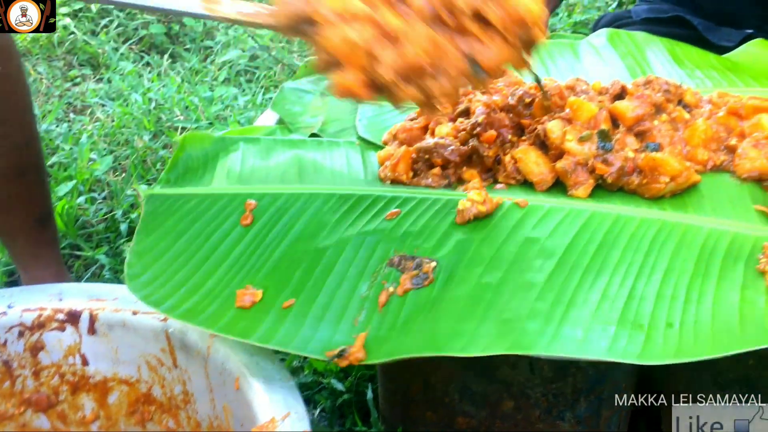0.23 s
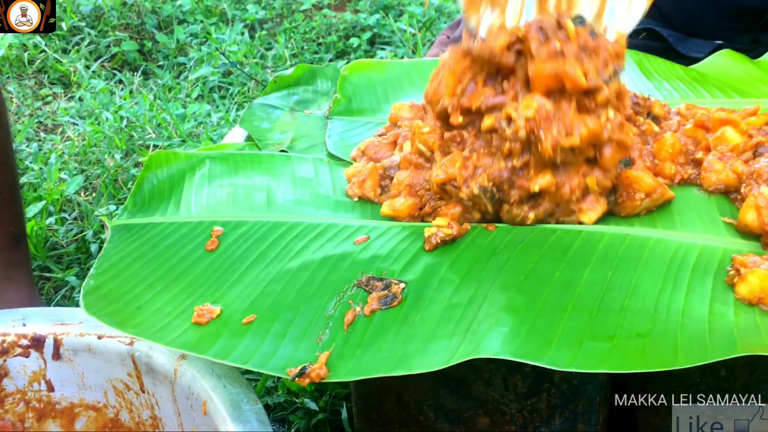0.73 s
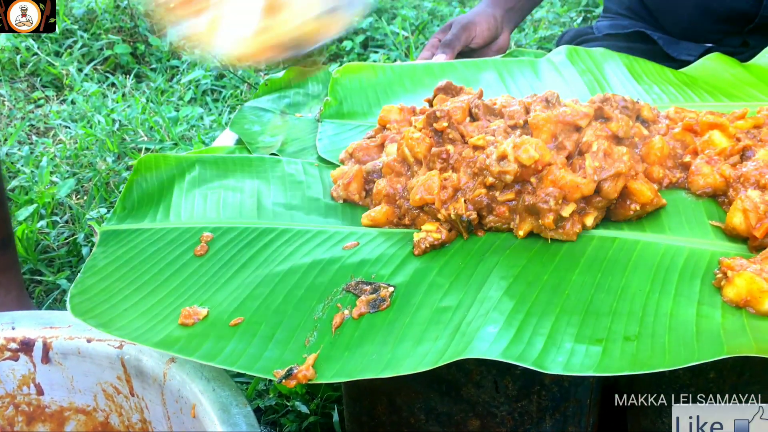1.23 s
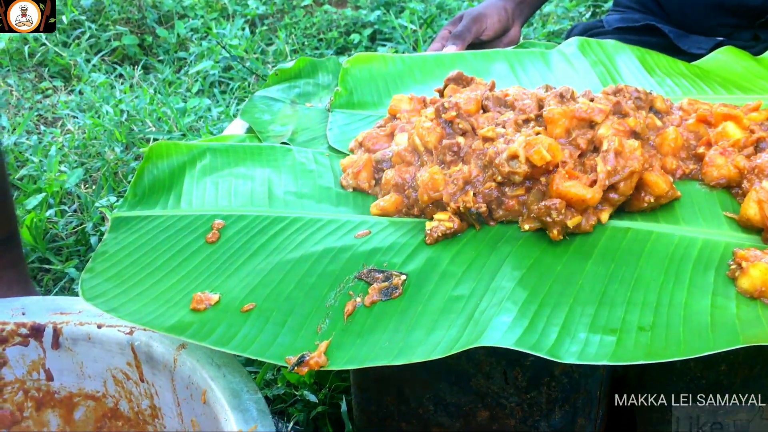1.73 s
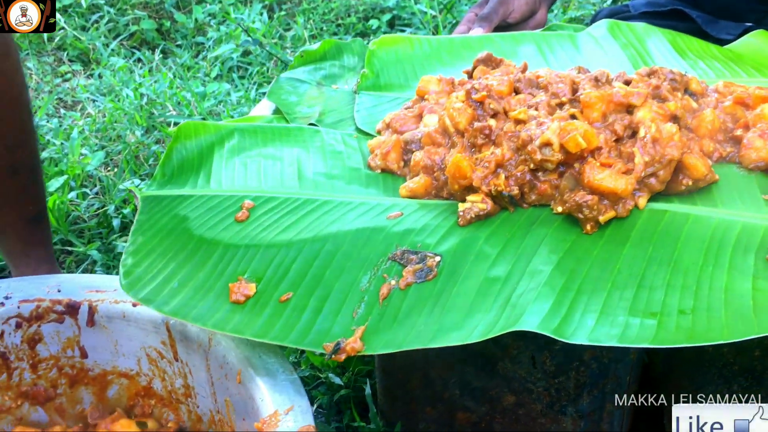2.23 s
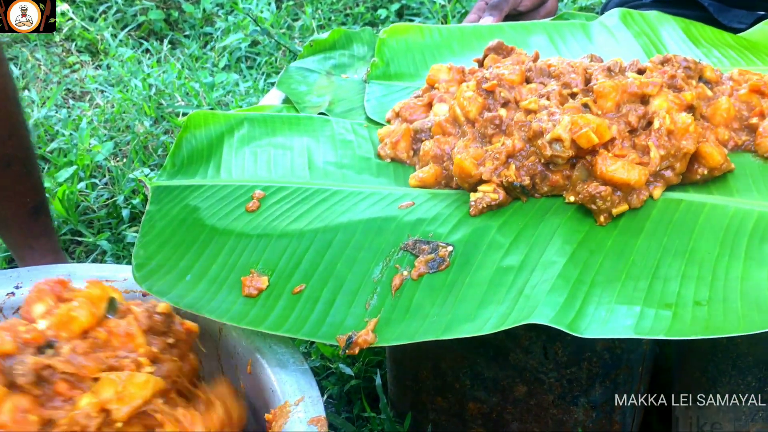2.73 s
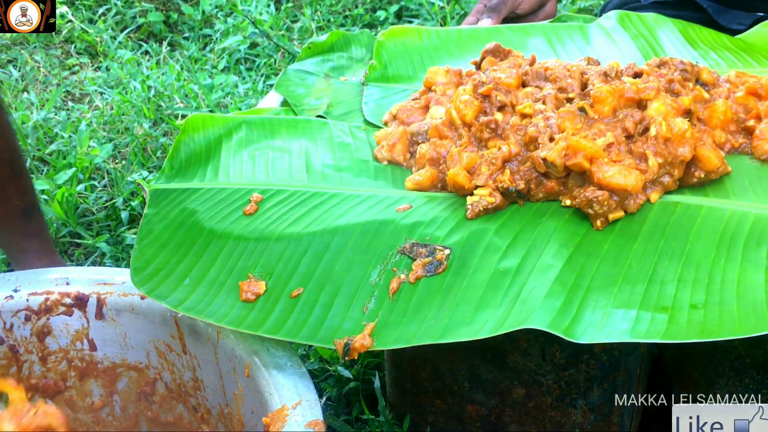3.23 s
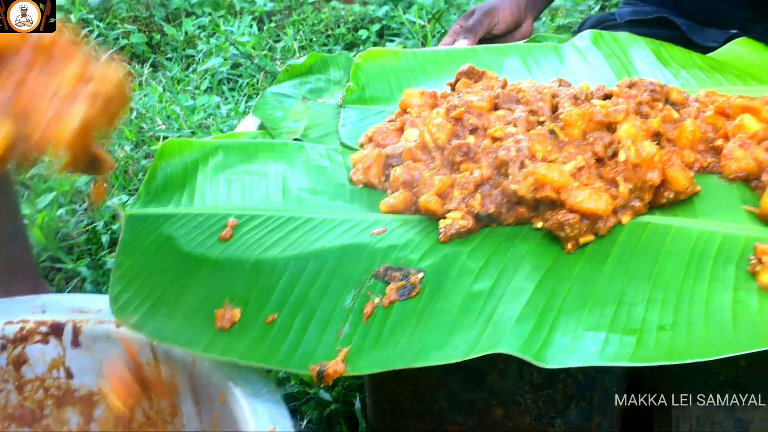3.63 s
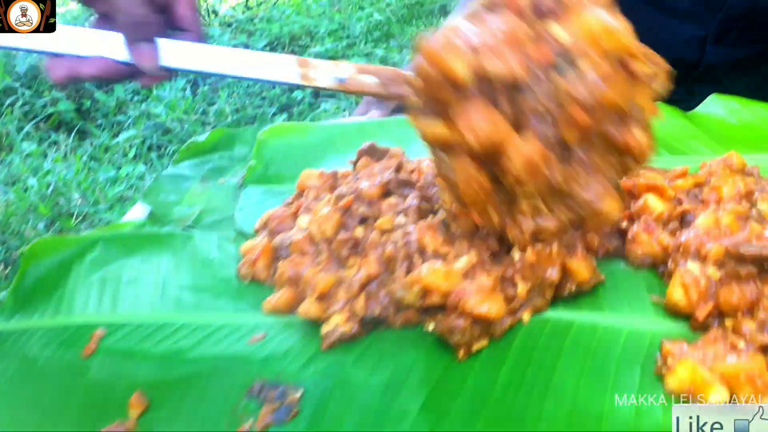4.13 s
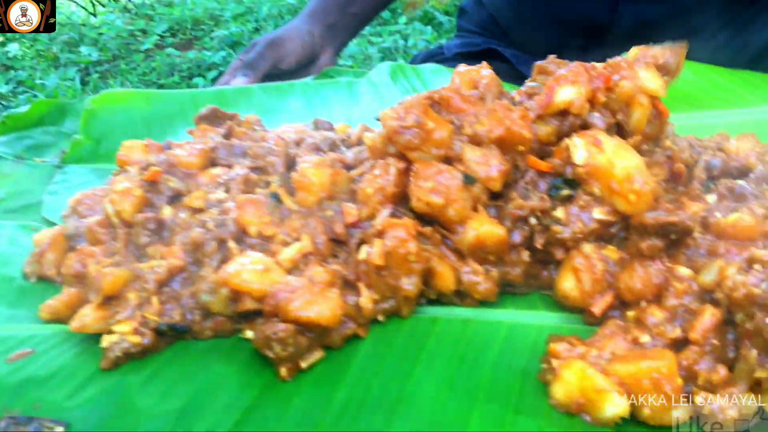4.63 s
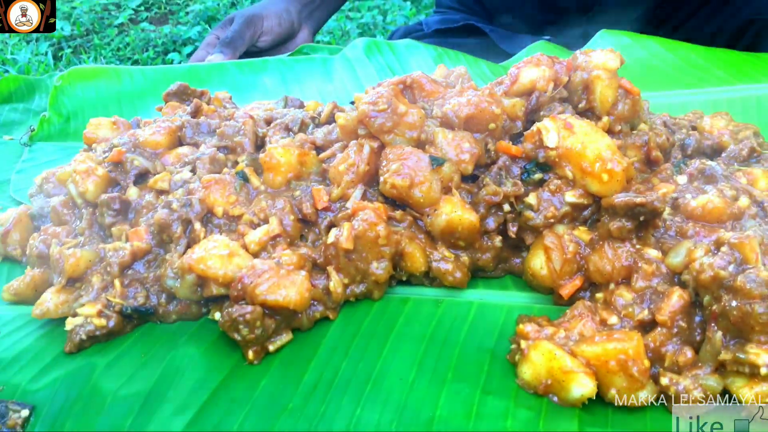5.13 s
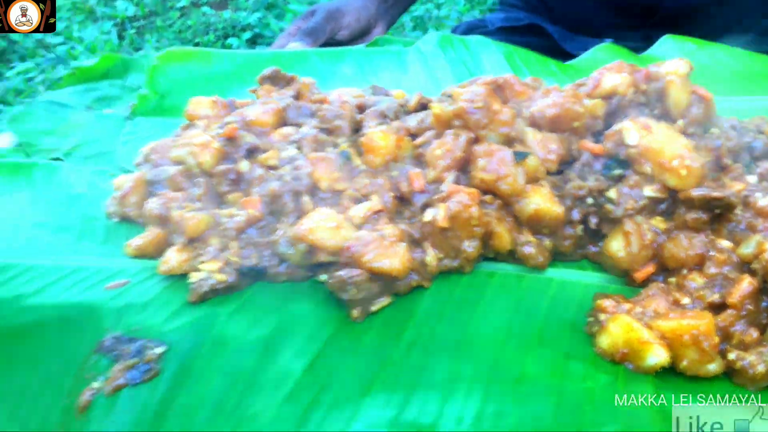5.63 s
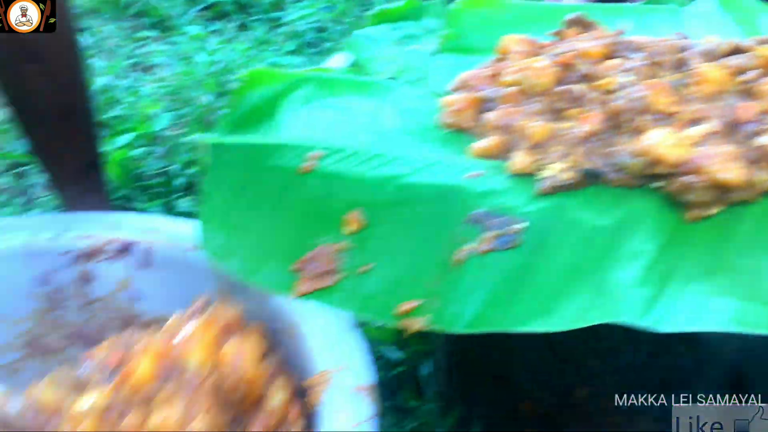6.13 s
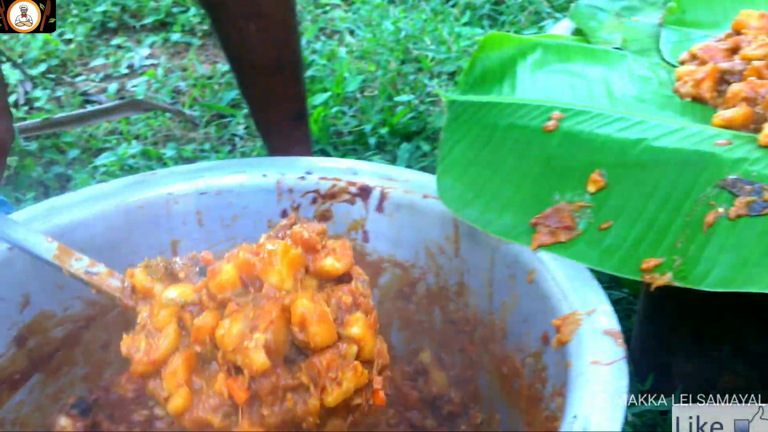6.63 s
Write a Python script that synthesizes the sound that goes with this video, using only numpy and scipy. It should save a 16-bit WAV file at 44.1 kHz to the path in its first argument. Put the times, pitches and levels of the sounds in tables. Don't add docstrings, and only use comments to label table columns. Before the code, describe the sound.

Outdoors, a metal ladle gives two short, rough scrapes through thick food in a metal pot, with knocks, wet plops and sticky crackles.

```python
import sys
import numpy as np
from scipy import signal
from scipy.io import wavfile
from scipy.ndimage import uniform_filter1d

SR = 44100
rng = np.random.default_rng(int(sys.argv[2]) if len(sys.argv) > 2 else 0)


def to_linear_factor(level_db):
    exponent = np.asarray(level_db, float) / 20
    return 10 ** exponent


def put_to_file(sound):
    columns = np.atleast_2d(sound).T
    safe = np.clip(columns, -1, 1)
    whole_steps = np.round(safe * 32767)
    wavfile.write(sys.argv[1], SR, whole_steps.astype(np.int16))


N = 303849

# (frequency [Hz], density [dB/Hz])
AIR_SPECTRUM = [(15, -36), (25, -2), (70, 2), (127, -1.5), (427, -34.5), (516, -17.5), (1480, -24.5),
                (2220, -24), (2760, -32), (3160, -23.5), (4870, -29.5), (9320, -38), (14800, -42.5),
                (16000, -51)]
# (time [s], cycle rate [Hz], level [dB])
ENGINE_CURVE = [(0.0, 28.12, -50.5), (1.92, 27.22, -51.5), (3.67, 24.25, -51.5), (4.05, 24.38, -57),
                (4.72, 23.67, -55), (6.62, 25.41, -55), (6.75, 24.6, -62), (6.89, 26.4, -60)]
# (multiple of cycle rate [-], level [dB])
ENGINE_ORDERS = [(2, -2.5), (3, -7), (4, -6), (5, -11.5), (6, -9), (7, -15)]
# (time [s], peak [dB])
CHIRPS = [(0.565, -59), (0.96, -62), (1.36, -61), (2.88, -61), (3.64, -63), (4.07, -59), (4.53, -60),
          (4.865, -50), (5.235, -57), (5.94, -55), (6.32, -60), (6.68, -61)]
# (start [s], end [s], fizz level [dB], top fizz level [dB])
RUSTLES = [(0, .05, -57, -68), (.17, 0.313, -63.5, -79), (.44, .52, -63, -70), (0.64, 0.765, -72, -68),
           (1.717, 1.82, -62.5, -67), (2.29, 2.483, -66, -61), (2.78, 2.96, -68, -62),
           (2.468, 2.561, -55.5, -58), (2.55, 2.642, -66, -69), (2.639, 2.795, -58.5, -54),
           (2.848, 2.902, -56.5, -65), (2.94, 3.078, -61.5, -64), (3.173, 3.265, -82, -71),
           (3.898, 4.102, -58.5, -62.5), (4.221, 4.412, -63.5, -62), (4.4, 4.51, -62, -55),
           (4.45, 4.59, -60.5, -55), (5.432, 5.552, -67, -80), (5.89, 6.003, -60, -72),
           (6.011, 6.228, -56, -59.5), (6.28, 6.448, -66, -73), (6.474, 6.587, -63, -64.5),
           (6.805, 6.89, -62.5, -65)]
# (middle [s], level [dB], length [s])
HEAVES = [
    (0.25, -62, 0.2),
    (2.1, -57, 0.3),
    (3.6, -60, 0.3),
    (3.92, -56, .07),
    (4.44, -56, 0.09),
    (4.62, -56, .08),
    (5.8, -56, 0.3),
]
# (time [s], peak [dB], pitch [Hz])
FILM_TICKS = [(2.3452, -35, 12600), (2.3891, -55, 12300), (2.4116, -67, 10500), (2.4116, -52, 14800),
              (2.4235, -50, 11200), (2.4405, -48, 11900), (2.4889, -44, 12400), (2.5118, -46, 11100),
              (2.5258, -61, 13400), (2.5258, -41, 12100), (2.5408, -36, 14100), (2.5617, -49, 11900),
              (2.648, -44, 12300), (2.7174, -36, 12300), (2.8157, -53, 13200), (2.8396, -50, 11900),
              (2.8581, -53, 11700), (2.8825, -49, 11700), (2.9109, -69, 12700), (2.9109, -46, 12300),
              (2.9404, -50, 12800), (2.9593, -49, 14400), (2.9748, -47, 13500), (3.0012, -43, 11400),
              (3.0097, -45, 14800), (3.0357, -50, 15200), (3.1684, -47, 12600), (3.2003, -44, 15000),
              (2.3453, -42, 8560), (2.3967, -53, 6720), (2.3967, -44, 5680), (2.4237, -46, 9810),
             (2.4306, -44, 5030), (2.4441, -39, 6910), (2.4945, -53, 9630), (2.4945, -39, 6330),
             (2.512, -35, 7200), (2.5184, -36, 6980), (2.5454, -35, 5880), (2.5858, -52, 9110),
             (2.5858, -44, 8650), (2.5933, -40, 5280), (2.6322, -41, 5100), (2.7005, -42, 5570),
             (2.8672, -46, 5710), (2.8826, -37, 7390), (2.9415, -52, 9760), (2.955, -39, 8750),
             (2.9749, -46, 5220), (3.0093, -56, 6870), (3.0093, -41, 5630), (3.0462, -46, 5820),
             (3.0647, -42, 8040), (3.1974, -44, 7880),
              (5.9123, -52, 6230), (5.9302, -46, 6160), (5.9756, -48, 6610), (6.0205, -43, 14300),
              (6.0395, -43, 6440), (6.0719, -40, 9400), (6.0983, -40, 8520), (6.1597, -37, 7050),
              (6.1876, -41, 8540), (6.238, -35, 6050), (6.264, -45, 6300), (6.2884, -42, 6350),
              (6.3697, -49, 9420), (6.4211, -47, 6000), (6.4211, -45, 6450), (6.479, -40, 6380),
              (6.4999, -44, 9700), (6.5438, -35, 6790), (6.5683, -42, 13600), (6.5962, -47, 12300),
              (6.6117, -41, 6260), (6.6371, -49, 8200), (6.7289, -45, 6530), (6.7489, -46, 7220),
              (6.7768, -48, 6290), (6.8117, -49, 13000), (6.8202, -48, 8660), (6.8401, -50, 6060),
              (6.8596, -51, 12700), (6.8651, -48, 11500),
              (0.0323, -45, 8290), (0.2404, -49, 6050), (0.2688, -44, 6020), (0.4494, -40, 13400),
               (0.4793, -37, 6160), (0.5137, -34, 7710), (0.6679, -38, 7290), (0.7003, -43, 6160),
               (0.7332, -36, 8430), (0.7532, -31, 8570), (0.856, -50, 6470), (1.7559, -41, 8170),
               (1.8118, -48, 7190), (1.8492, -41, 6170),
              (3.9228, -41, 7810), (3.9238, -39, 6780), (4.1508, -43, 6480), (4.2282, -42, 6210),
              (4.2661, -42, 6940), (4.2995, -39, 6090), (4.3643, -45, 6660), (4.3813, -43, 8300),
              (4.4097, -36, 11800), (4.5923, -45, 9100), (4.7101, -53, 6770), (4.7699, -40, 8250),
              (5.192, -48, 7010), (5.2713, -51, 6690), (5.4434, -49, 6140), (5.4963, -51, 6150)]
# (time [s], peak [dB], pitch [Hz], spray re peak [dB])
TIPPED_LUMPS = [(0.023, -39, 1950, -4), (0.219, -35, 815, -25), (0.27, -20.5, 950, -27),
                (0.336, -38, 2970, -28), (0.454, -39.5, 1200, -6), (0.477, -39, 3290, -2),
                (0.491, -34, 1270, -13), (0.514, -33.5, 7140, -22), (0.733, -36.5, 8430, -9),
                (0.753, -35, 4600, -1), (1.382, -38.5, 3240, -24)]
# (time [s], peak [dB], pitch [Hz], spray re peak [dB])
SNAGGED_LUMPS = [
    (1.74, -37.5, 3670, -19),
    (1.813, -36.5, 2280, -18),
    (1.8487, -23, 2100, -37),
    (1.9006, -36, 2020, -17),
    (2.163, -9, 2980, -35),
    (2.2827, -20.5, 2440, -23),
    (2.3451, -34.5, 12650, 0),
    (5.5588, -31, 3550, -28),
    (5.5847, -21, 3500, -5),
    (5.6725, -10, 3220, -24),
]
# (time [s], peak [dB], pitch [Hz], spray re peak [dB], T60 [s])
DROPPED_LUMPS = [(3.4441, -25.5, 2200, -22, 0.034), (3.4655, -23, 6140, -12, 0.032),
                 (3.4704, -36, 1430, -16.5, 0.016), (3.5079, -36, 3950, -22, 0.021),
                 (3.5433, -37, 2480, -3, 0.023), (3.5474, -30, 12100, -26, 0.025),
                 (3.5668, -17.5, 3940, -19, 0.012), (3.5704, -17.5, 3920, -19.5, 0.014),
                 (3.6184, -23, 5860, -16.5, 0.026), (3.6237, -19.5, 2500, -6.5, 0.019),
                 (3.6616, -38, 3080, -1, 0.02), (3.7125, -23.5, 3500, -11, 0.025),
                 (3.7174, -25, 4150, -18, 0.028), (3.7239, -17, 7200, -26, 0.014),
                 (3.7304, -21.5, 3500, -27, 0.021), (3.7404, -33, 1780, -21.5, 0.019),
                 (3.7738, -40, 8000, -6, 0.03), (3.8067, -21, 2100, -15, 0.035),
                 (3.8144, -34, 5500, -22, 0.03), (3.8796, -40, 1380, -25.5, 0.025),
                 (3.9144, -34, 1100, -24, 0.025), (3.9235, -27, 3320, -14, 0.03)]
# (time [s], peak [dB], pitch [Hz])
SAUCE_SNAPS = [(2.4443, -38.5, 2020), (2.4947, -36, 6330), (2.5114, -33.5, 9440), (2.5187, -31, 4160),
               (2.5456, -36, 5870), (2.586, -35.5, 1840), (2.6045, -35, 4570), (2.6214, -31, 3410),
               (2.6319, -30, 3280), (2.6983, -37.5, 2200), (2.7414, -39, 3310), (2.8823, -36, 9000),
               (2.9557, -29.5, 3380), (3.244, -34, 9000), (3.3238, -33, 5500), (3.3917, -34, 4000),
               (4.2782, -37.5, 3640), (4.3331, -37, 4300), (4.7701, -54, 10000), (5.9303, -35.5, 4250),
               (6.049, -36, 2110), (6.1303, -34, 3730), (6.1567, -33, 2340), (6.1832, -32.5, 2610),
               (6.2381, -35, 6100), (6.2889, -33.5, 4300), (6.479, -27, 4300), (6.5, -33.5, 2660),
               (6.5484, -33.5, 1817), (6.5693, -32.5, 2400),
               (0.45, -42.5, 8800), (0.667, -45, 4040), (0.856, -38, 3800), (1.77, -42, 13000),
           (2.39, -41, 2520), (2.4239, -38.5, 4570), (2.4854, -38, 3490), (2.5404, -39.5, 12500),
           (2.5934, -35, 6200), (2.7174, -39, 12300), (2.8709, -41, 2505), (3.0096, -36, 11000),
           (3.0579, -39, 3330), (3.1976, -39, 7880), (3.2625, -35.5, 5670), (4.1759, -42.5, 3910),
           (4.2283, -40, 5550), (4.2992, -40, 10000), (4.4099, -37.5, 3130), (5.4964, -38, 3780),
           (5.5674, -40, 5130), (6.0216, -41, 12000), (6.074, -40, 12000), (6.099, -39, 12500),
           (6.127, -40, 12500), (6.55, -31, 11000), (6.6117, -38, 6260), (6.7294, -35.5, 3530),
           (6.8402, -39.5, 1780)]
# (time [s], peak [dB], pitch [Hz])
PLOPS = [(3.247, -44, 1750), (3.324, -46, 2050), (3.324, -44, 650), (3.391, -44, 1750), (3.466, -37, 2050),
         (4.032, -48, 1350), (4.043, -45, 2200), (4.183, -49, 1500), (4.265, -48, 2400), (4.278, -46, 900),
         (4.358, -45, 1300), (4.41, -47, 750), (4.592, -47, 650), (5.271, -45, 6000), (5.487, -46, 1600),
         (3.729, -30, 1350), (3.625, -33, 1500), (5.559, -42, 570), (6.265, -43, 6000)]
# (time [s], low mode peak [dB], low mode [Hz], second mode [dB], upper modes [dB])
BLOWS = [(0.196, -40, 371, -54.5, -54), (1.849, -21, 307, -30, -21), (2.282, -13, 259, -3.5, -19),
         (2.331, -37, 180, -39.5, -48), (3.47, -45, 270, -58, -65), (3.568, -48, 300, -46, -48),
         (3.807, -52, 300, -50, -42), (6.23, -49, 275, -60, -75), (3.247, -24.5, 274, -34.5, -60),
         (3.33, -40.5, 263, -60.5, -74), (3.624, -40.5, 253, -44.5, -54), (3.712, -49.5, 360, -41.5, -40),
         (3.883, -36, 238, -50, -42), (3.893, -39.5, 170, -42, -41), (3.924, -42, 397, -38, -37),
         (4.402, -41, 224, -71, -54), (4.433, -42.5, 205, -75, -56), (4.492, -41, 183, -72, -57),
         (4.599, -41, 190, -60, -52), (5.581, -28, 283, -37.5, -28), (5.86, -13.5, 251, -26.5, -25),
         (6.517, -34.5, 284.9, -49.5, -61)]
# (frequency [Hz], level [dB], T60 [s])
UPPER_MODES = [(910, -1, 0.029), (1216, -5, 0.052), (1500, 0.5, 0.01), (1860, 1, .04), (2235, -2, 0.015),
               (3220, -6.5, 0.018)]
# (time [s], rasp level [dB])
STROKES = [
    [(1.9, -71), (1.955, -34), (1.985, -31.5), (2.03, -37), (2.062, -29.5), (2.15, -30), (2.17, -26.5),
     (2.256, -32), (2.28, -52)],
    [(5.572, -58), (5.581, -33.5), (5.679, -25), (5.71, -22.5), (5.808, -23.5), (5.826, -56)],
    [(5.834, -40), (5.838, -24.5), (5.857, -26.5), (5.875, -46.5)],
]
# (frequency [Hz], density [dB/Hz])
WALL_RESPONSE = [(110, -44), (180, -14), (202, -19), (275, -7), (364, -14), (656, -1.5), (860, -5),
                 (1160, -3), (1840, -1.5), (2000, 0.5), (2240, -5.5), (3210, -1.5), (9000, -23),
                 (11700, -46.5), (19800, -120)]
LOW_WALL_HZ = [215, 283, 400, 490, 571, 668, 800, 926, 1050, 1170, 1240]
# (middle [s], frequency [Hz], level re rasp [dB])
STREAKS = [(2.004, 1250, -5), (2.054, 2360, -7), (2.093, 3700, -2), (2.129, 4550, -4), (2.195, 4330, 0.5),
           (2.235, 4110, 2.5), (2.229, 2510, -5), (5.629, 1240, -12), (5.672, 4175, -2.5),
           (5.719, 3320, -3), (5.74, 4700, -5), (5.77, 5600, -7), (5.79, 4340, -4.5), (5.801, 6130, -8),
           (1.96, 290, -9), (2.0, 290, -10), (2.055, 290, -17), (2.09, 670, -10), (2.22, 660, -13),
           (2.255, 225, -11), (1.975, 1170, -6), (5.64, 280, -15), (5.645, 570, -10), (5.71, 920, -12),
           (5.76, 290, -21), (5.79, 310, -18), (5.8, 600, -17), (5.65, 9000, -18), (5.68, 10000, -15),
           (5.74, 11700, -18), (5.857, 2285, -1.5), (5.855, 3100, -4)]
# (time [s], peak [dB])
GRABS = [(1.952, -27), (1.984, -23), (2.054, -21), (2.088, -20), (2.119, -22), (2.218, -19), (5.605, -24),
         (5.688, -16), (5.702, -18), (5.717, -15), (5.728, -15), (5.738, -14), (5.763, -18), (5.778, -15),
         (5.796, -16), (5.852, -17)]

FIRM_STROKE_DB = -28


def set_rms_db(x, db):
    return x * to_linear_factor(db) / np.sqrt(np.mean(x ** 2))


def band(x, lo_hz, hi_hz, order=2):
    return signal.sosfilt(signal.butter(order, [lo_hz, min(hi_hz, .45 * SR)], "bandpass", fs=SR, output="sos"), x)


def read(table):
    s, *columns = np.transpose(table)
    return [np.interp(np.arange(N) / SR, s, c) for c in columns]


def walk(rate_hz, size=N):
    k = int(SR / rate_hz)
    held = np.repeat(rng.standard_normal(size // k + 1), k)
    return 1.3 * uniform_filter1d(uniform_filter1d(held, k), k)[:size]


def clicks(rate_hz, spread_db):
    hit = rng.random(N) < rate_hz / SR
    return set_rms_db(hit * rng.standard_normal(N) * to_linear_factor(spread_db * rng.exponential(size=N)), 0)


def add(out, s, sound):
    i = int(s * SR)
    out[i:i + len(sound)] += sound[:N - i]


def ring(hz, t60_s, rise_s):
    t = np.arange(SR // 8) / SR
    shape = (1 - np.exp(-(t / rise_s) ** 2)) * to_linear_factor(-60 * t / t60_s)
    return shape / shape.max() * np.sin(2 * np.pi * hz * t)


def air():
    out = 0
    f_hz, density_db = np.transpose(AIR_SPECTRUM)
    for hz in 32 * 2 ** np.arange(0, 9, .5):
        flicker_db = 2.5 * walk(4) * min(200 / hz, 1)
        db = np.interp(np.log(hz), np.log(f_hz), density_db) + flicker_db
        out = out + to_linear_factor(db) * band(rng.standard_normal(N), hz / 2 ** .25, hz * 2 ** .25)
    return set_rms_db(out, -52)


def engine():
    cycle_hz, db = read(ENGINE_CURVE)
    phase = 2 * np.pi * np.cumsum(cycle_hz * (1 + 0.0057 * walk(13))) / SR
    out = 0
    for k, order_db in ENGINE_ORDERS:
        fade_db = 2.5 * walk(1.5) + 3.0 * walk(8)
        out = out + to_linear_factor(order_db + fade_db) * np.sin(int(k) * phase + k ** 2)
    return to_linear_factor(db) * out


def cricket():
    reed_hz, chirp_s = 3140, 0.045
    reed = set_rms_db(band(rng.standard_normal(N), reed_hz - 60, reed_hz + 60), 0)
    gain = to_linear_factor(-80 + 4.0 * walk(12))
    t = np.arange(int(chirp_s * SR)) / SR
    for s, db in CHIRPS:
        add(gain, s, to_linear_factor(db - 9) * np.sin(np.pi * t / chirp_s))
    return gain * reed


def sauce_slide():
    t = np.arange(N) / SR
    gains = np.full((2, N), to_linear_factor(-69))
    for t0, t1, fizz_db, top_db in RUSTLES:
        spell = np.clip(np.minimum(t - t0, t1 - t) / 0.035, 0, 1)
        gains += spell * to_linear_factor(np.array([[fizz_db], [top_db]]))
    out = 0
    flutter = to_linear_factor(1.6 * walk(60))
    snaps = clicks(rate_hz=90, spread_db=1.5)
    smear = to_linear_factor(-60 * np.arange(256) / SR / 0.00387) * rng.standard_normal(256)
    for hz in 1800 * 1.4 ** np.arange(7):
        pops = signal.fftconvolve(clicks(rate_hz=80, spread_db=1.5) + .7 * snaps, smear)[:N]
        gain = gains[0] * to_linear_factor(-9) if hz < 7500 else gains[1] * to_linear_factor(-7.0)
        fizz = gain * flutter * set_rms_db(band(rng.standard_normal(N), hz / 1.3, hz * 1.19), -2)
        pops = np.sqrt(gain) * set_rms_db(band(pops, hz / 1.19, hz * 1.19), -37.5 - hz / 2500)
        out = out + fizz + pops
    return out


def leaf_rumble():
    t = np.arange(N) / SR
    leaf = rng.standard_normal(N)
    heave = to_linear_factor(-68.5)
    for s, db, length_s in HEAVES:
        heave = heave + to_linear_factor(db) * np.exp(-((t - s) / length_s) ** 2 * 2)
    body = set_rms_db(band(leaf, 160, 330), 0) + set_rms_db(band(leaf, 330, 1300, order=1), -8)
    return heave * to_linear_factor(3.0 * walk(10)) * body


def ticks():
    t60_s, pitch_spread = .007, .12
    out, t = np.zeros(N), np.arange(400) / SR
    rows = FILM_TICKS
    fade = to_linear_factor(-60 * t / t60_s) * np.minimum(t / .0003, 1)
    for (s, db, hz), (a, b) in zip(rows, rng.standard_normal((len(rows), 2, 5, 1))):
        pop = fade * np.sin(2 * np.pi * hz * (1 + pitch_spread * a) * t + 3 * b).sum(axis=0)
        add(out, s, to_linear_factor(db - 3) * pop / np.abs(pop).max())
    return out


def splats():
    base_t60_s, t60_s_per_db, pitch_cycles = 0.008, 0.0006, 9
    closing_spray_db = -22
    out, t = np.zeros(N), np.arange(2048) / SR
    short = TIPPED_LUMPS + SNAGGED_LUMPS
    short = short + [row + (closing_spray_db,) for row in SAUCE_SNAPS + PLOPS]
    lumps = list(DROPPED_LUMPS)
    for s, db, hz, spray_db in short:
        t60_s = base_t60_s + t60_s_per_db * max(db + 40, 0) + pitch_cycles / hz
        lumps.append((s, db, hz, spray_db, t60_s))
    for (s, db, hz, spray_db, t60_s), (a, b) in zip(lumps, rng.standard_normal((len(lumps), 2, 2048))):
        fade = to_linear_factor(-60 * t / t60_s) * np.minimum(t / .0008, 1)
        body = band(a * fade, hz / 1.094, hz * 1.11, order=1)
        wide = band(a * fade, hz / 2.2, hz * 1.45)
        spray = band(b * fade ** 2.1, 7500, 16000)
        puff = body / np.abs(body).max() + 0.5 * wide / np.abs(wide).max()
        add(out, s, to_linear_factor(db) * (0.53 * puff + to_linear_factor(spray_db) * spray / np.abs(spray).max()))
    return out


def blows():
    second_hz, third_hz = 592, 410
    out, t = np.zeros(N), np.arange(SR // 8) / SR
    chance = rng.standard_normal((len(BLOWS), len(UPPER_MODES) + len(t)))
    for (s, low_db, low_hz, second_db, upper_db), row in zip(BLOWS, chance):
        t60_s = 0.033 + 0.0008 * max(-12 - low_db, 0)
        between_db = (low_db + upper_db) / 2
        nudge, noise = row[:len(UPPER_MODES)], row[len(UPPER_MODES):]
        upper = 0
        for (hz, db, mode_t60_s), n in zip(UPPER_MODES, nudge):
            upper = upper + to_linear_factor(db + 1.5 * n) * ring(hz * (1 + .015 * n), mode_t60_s, 0.0018)
        deep = to_linear_factor(low_db - 1.5) * ring(low_hz, t60_s, 0.0055)
        deep -= to_linear_factor(second_db + 4.5) * ring(second_hz, .75 * t60_s, .003)
        deep += (to_linear_factor(second_db - 13) + to_linear_factor(between_db - 6)) * ring(third_hz, .6 * t60_s, 0.0025)
        slosh_fade = to_linear_factor(-60 * t / 0.15)
        slosh = to_linear_factor(low_db - 1.5) * band(noise * slosh_fade * np.minimum(t / .01, 1), 170, 380)
        slosh = slosh + to_linear_factor(between_db + 4) * band(noise * slosh_fade, 330, 800)
        grit = to_linear_factor(upper_db + 6.5) * band(noise * to_linear_factor(-60 * t / .04), 700, 2600)
        add(out, s, deep + to_linear_factor(upper_db - 6) * upper + slosh + grit)
    return out


def wall_modes(slips):
    f_hz, density_db = np.transpose(WALL_RESPONSE)
    boom, rasp = 0, 0
    high_hz = np.cumsum(90 + 220 * rng.random(40)) + 1280
    for hz in np.append(LOW_WALL_HZ, high_hz):
        flare_db = min(hz / 200, 3.5) * walk(35.15, size=len(slips))
        gain = to_linear_factor(np.interp(np.log(hz), np.log(f_hz), density_db) + flare_db)
        mode = gain * set_rms_db(band(slips, hz - 18 - .014 * hz, hz + 18 + 0.016 * hz, order=1), 0)
        if hz < 1300:
            boom = boom + mode
        else:
            rasp = rasp + mode
    return boom, rasp


def drags():
    grab_s, grab_db = .003, -17
    out = np.zeros(N)
    all_slips = clicks(rate_hz=9000, spread_db=1.3) * to_linear_factor(1.5 * walk(150))
    for stroke in STROKES:
        t0, t1 = stroke[0][0], stroke[-1][0]
        part = slice(int(t0 * SR), int(t1 * SR))
        push_db = read(stroke)[0][part] - FIRM_STROKE_DB
        slips, t = all_slips[part], np.arange(N)[part] / SR
        boom, rasp = wall_modes(slips)
        rasp = rasp / np.sqrt(uniform_filter1d(rasp ** 2, size=900))
        rasp = band(rasp, 1550, 8300)
        for s, hz, streak_db in STREAKS:
            if t0 < s < t1:
                half_s = .5 * (0.018 + min(50 / hz, .032))
                swell = np.exp(-((t - s) / half_s) ** 4)
                half_hz = min(.1 * hz, 80)
                rasp = rasp + swell * set_rms_db(band(slips, hz - half_hz, hz + half_hz), streak_db)
        boom = set_rms_db(band(boom, 200, 1300), 2.5)
        grab = 0
        for s, db in GRABS:
            grab = grab + to_linear_factor(db + grab_db - FIRM_STROKE_DB) * np.exp(-((t - s - grab_s) / grab_s) ** 2)
        top = band(np.roll(slips, shift=200), 9800, 14500, order=1)
        top = set_rms_db(top, 1.5 * walk(60, size=len(slips)))
        touch = np.clip(np.minimum((t - t0) / 0.004, (t1 - t) / 0.012), 0, 1)
        layers = (to_linear_factor(push_db - .8) + grab) * rasp
        layers = layers + to_linear_factor(-9.5 + 0.35 * push_db) * boom + to_linear_factor(-20 + 0.45 * push_db) * top
        out[part] = touch * to_linear_factor(FIRM_STROKE_DB) * layers
    return out


def scene():
    near = drags() + blows() + splats() + ticks()
    tail = rng.standard_normal(4096) * to_linear_factor(-60 * np.arange(4096) / SR / .05)
    echo = band(tail, 200, 3000, order=1) / np.sqrt(np.sum(tail ** 2))
    near = near + to_linear_factor(-8.5) * signal.fftconvolve(near, echo)[:N]
    return (near + sauce_slide() + leaf_rumble() + engine() + cricket() + air())[None]


def top_cut(x):
    return signal.sosfilt(signal.butter(12, 16520, fs=SR, output="sos"), x)


def record(dry):
    low_hz, dip_hz, top_hz, overload = 36, 10260, 15450, .71
    x = signal.sosfilt(signal.butter(3, low_hz, "highpass", fs=SR, output="sos"), dry)
    x = x - .4 * band(x, dip_hz - 400, dip_hz + 400, order=1)
    x = np.clip(x, -overload, overload)
    x = signal.sosfilt(signal.ellip(6, .2, 32, top_hz, fs=SR, output="sos"), x)
    return top_cut(x)


dry = scene()
out = record(dry)
put_to_file(out)
```